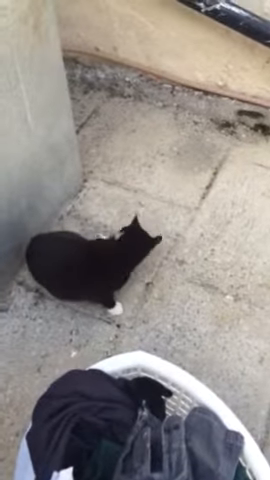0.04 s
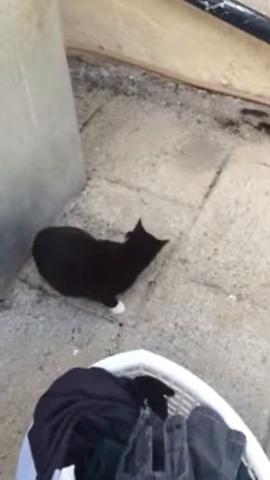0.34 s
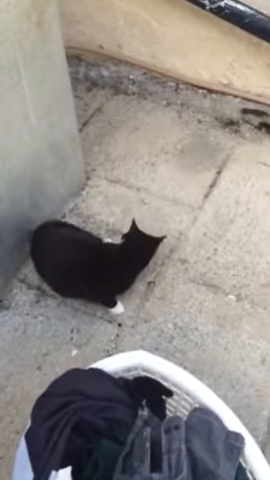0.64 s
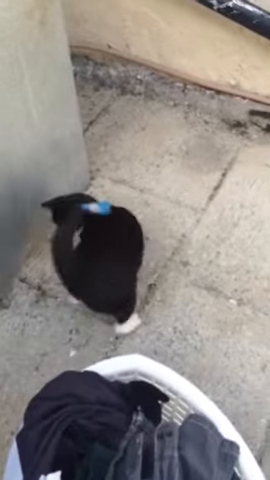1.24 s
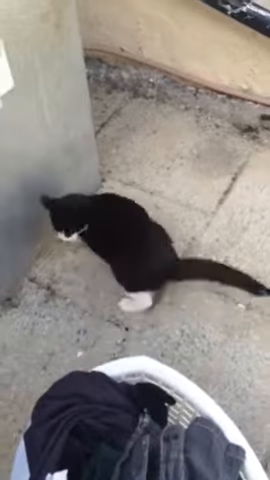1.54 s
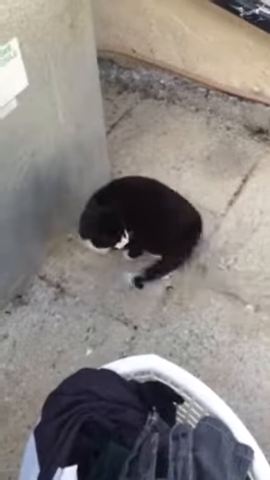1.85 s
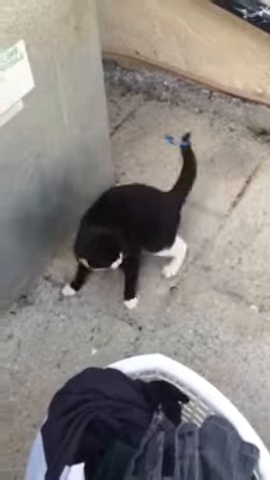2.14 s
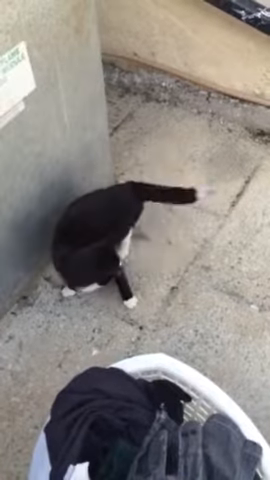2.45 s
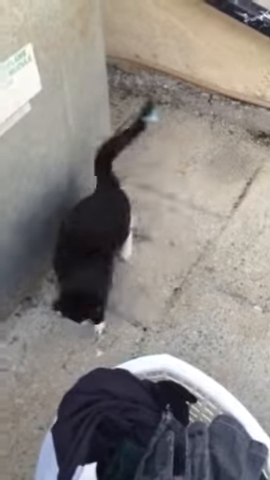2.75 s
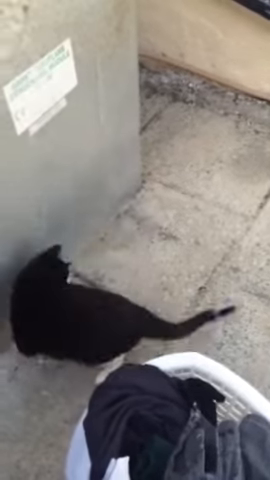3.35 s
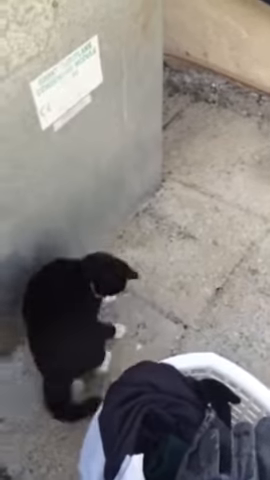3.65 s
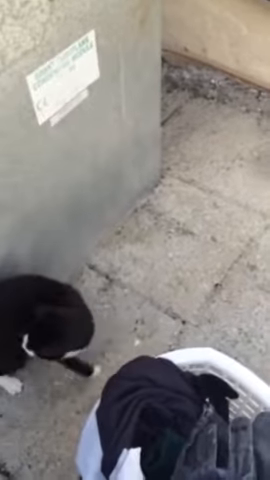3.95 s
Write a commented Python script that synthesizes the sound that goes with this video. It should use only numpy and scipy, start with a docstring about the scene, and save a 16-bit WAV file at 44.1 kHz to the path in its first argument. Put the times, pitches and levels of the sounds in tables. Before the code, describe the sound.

A plastic peg clicks on paving and bangs a metal cabinet, with faint birds behind.

```python
"""Cat with a peg on its tail

A cat spins in a small paved yard, a plastic clothes peg on its tail. The peg clicks on the slabs
and bangs a sheet-metal cabinet, which booms and clangs; paws thud softly and scuff over grit.
The walls throw back a short echo, and small birds whistle and trill far off over a low outdoor hum."""
import sys
import numpy as np
from scipy import signal
from scipy.fft import rfft, irfft
from scipy.io import wavfile

SR = 44100
rng = np.random.default_rng(int(sys.argv[2]) if len(sys.argv) > 2 else 0)


def generate_wav(sig):
    """Save sig (samples, or channels by samples) to the path in sys.argv[1] as 16-bit PCM at SR."""
    pcm = np.round(np.clip(np.atleast_2d(sig).T, -1, 1) * 32767).astype(np.int16)
    wavfile.write(sys.argv[1], SR, pcm)


N = 176400

# spectra of the still air and the distant hum (frequency [Hz], relative density [dB])
AIR_SPECTRUM = [(15, -42), (25, -5.5), (82, -1.5), (209, -2.5), (253, -11), (340, -18.5), (433, -14.5),
                (598, -14.5), (666, -19), (919, -16.5), (2920, -31), (6210, -27), (7910, -36.5),
                (13200, -37), (15500, -43)]
HUM_SPECTRUM = [(100, -22.5), (170, -10), (200, 5.5), (235, -6.5), (330, -5), (450, -19), (900, -27),
                (2500, -36.5), (8000, -67.5)]
# the hum's swells (time [s], level [dB])
HUM_SWELLS = [(0, -61), (.35, -64.5), (.9, -63.5), (1.35, -55.5), (1.65, -57.5), (2.049, -58.5), (2.3, -53),
              (2.55, -58), (2.85, -57.5), (4, -57)]
# trill notes (time [s], length [s], top pitch [Hz], relative level [dB])
TRILL_NOTES = [(-.125, 0.14, 6400, -58), (.04, 0.15, 6500, -58), (.205, .13, 6550, -56.5),
               (.37, 0.14, 6600, -57.5), (1.6, 0.15, 5800, -68.5), (1.82, 0.17, 6000, -67.5),
               (2.05, .12, 6000, -66), (2.3, 0.16, 5900, -73), (3.611, 0.078, 5920, -51.5),
               (3.713, 0.089, 5830, -56), (3.802, .08, 5750, -57), (3.889, 0.088, 5830, -55.5)]
# a trill note's rise and fall (position [share of the note], pitch [share of the top pitch])
TRILL_CONTOUR = [(0, .72), (.22, .9), (.42, 0.96), (.6, .82), (.8, .63), (1, .52)]
# bird whistles and buzzy sweeps (time [s], length [s], first pitch [Hz], last [Hz], relative level [dB])
BIRD_WHISTLES = [(0.56, .175, 7780, 7050, -62), (0.869, 0.056, 7170, 7440, -63),
                 (1.056, .05, 5700, 5420, -58), (1.118, 0.19, 7180, 7410, -66),
                 (1.359, 0.089, 6330, 5859, -51.5), (1.447, .05, 5200, 5645, -66),
                 (2.525, 0.12, 5880, 6860, -57), (3.108, 0.094, 8100, 7760, -67),
                 (3.357, 0.12, 5900, 5264, -54)]
BIRD_SWEEPS = [(1.061, 0.042, 5550, 4010, -55), (1.667, 0.031, 4430, 4037, -68),
               (2.732, 0.045, 3920, 2886, -60), (2.824, 0.073, 3310, 5300, -52),
               (3.008, 0.052, 5900, 3500, -55)]
# decay of the far reverb around the birds (frequency [Hz], t60 [s])
FAR_DECAY = [(3000, .6), (8000, .7)]
# peg hits (time [s], relative level [dB], body [dB], treble [dB], favoured ring [Hz], its lift [dB])
PEG_HITS = [(0.2486, -47, -12, -3, 6000, 14), (0.7678, -22, -16, -15.5, 3000, -0.5),
            (0.7716, -19.5, -24, -13.5, 5000, 4), (.785, -32, -13, -15, 2200, 10),
            (0.9038, -33.5, 4.5, -8.5, 1950, 9.5), (0.907, -30, -18, -7, 3000, 2),
            (0.9174, -28, -3, -11, 2000, 10), (0.9541, -34, -3, 1.5, 10000, 4),
            (0.9755, -29.5, -1.5, -6, 5000, 9), (.9778, -30, -10, 3, 8000, 4),
            (0.9859, -33.5, 3, 0, 8000, 8), (1.3767, -45.5, 14, 0, 1300, 4),
            (1.795, -40, -12, -5, 9000, 3.5), (1.987, -19, 1, -10, 2500, -6),
            (1.9902, -17.5, -4, -0.5, 2400, 8.5), (1.9922, -12, -6, -9.5, 4950, 1),
            (2.1238, -13, -15, -0.5, 9800, 7), (2.1252, -12, -10.5, -1.5, 12000, -5),
            (2.127, -19, -2.5, -0.5, 3400, -10), (2.9045, -13.5, 12, 6.5, 9000, 2),
            (2.9081, -17, 3.5, -6, 5500, 9), (2.9212, -12, -5, 1.5, 6000, 4.5),
            (2.9355, -23, -12, 10.5, 4000, 7), (3.1899, -11.5, -23, 5.5, 5700, 12.5),
            (3.5186, -3, 0, -12.5, 3200, 9), (3.5289, -5.5, 3.5, -3, 3300, 9),
            (3.535, -12, -7, -3, 9000, 3), (3.552, -23.5, -19, -3, 3450, 18),
            (3.6053, -26, -8, -10, 5500, 6), (3.651, -27.5, -2, -11, 3500, 2),
            (3.656, -27, -3, -4.5, 3600, 5), (3.868, -49, -6, 3, 8100, 2), (3.878, -48, -8, 6.5, 10960, -1)]
# modes ringing in each click: the plastic peg's, plus a ring near 2 kHz
# (frequency [Hz], relative level [dB], t60 [s])
CLICK_MODES = [(1084, -8.5, 0.017), (1595, -9, 0.013), (1970, -10.5, 0.017), (2500, -3.5, 0.0083),
               (3205, 1.5, .01), (3520, -8.5, 0.023), (4850, 0, 0.0082), (5690, -1.5, 0.0091),
               (7320, 3.5, 0.0036), (9350, -4, 0.0053), (10320, 3.5, 0.0056), (12100, -8, 0.0069),
               (13700, -6, .006)]
# decay of the yard's echo (frequency [Hz], t60 [s])
YARD_DECAY = [(150, .2), (500, 0.151), (3000, 0.18), (7000, 0.18), (15000, 0.13)]
# tone of the yard's echo (frequency [Hz], relative gain [dB])
YARD_EQ = [(100, -2), (400, 1), (1500, 2), (6000, 3), (15000, 0.5)]
# soft bumps of body and paws (time [s], pitch [Hz], relative level [dB], t60 [s])
CAT_THUDS = [(.62, 148, -47, 0.06), (.755, 64.4, -57, 0.13), (.897, 154, -37, 0.066),
             (.955, 114, -42, 0.069), (1.855, 133, -50, 0.14), (2.182, 232, -41, 0.044),
             (2.228, 238, -51, 0.18), (2.295, 122.5, -42, 0.081), (2.941, 159.7, -24, 0.12),
             (3.70, 165, -46, 0.1), (3.936, 148, -41.5, 0.16), (3.957, 143.4, -28, 0.081),
             (3.978, 110, -30.5, 0.12)]
# scrapes over the slabs (time [s], length [s], level [dB])
PAW_SCUFFS = [(.74, 0.064, -60), (.775, 0.068, -49), (.875, 0.078, -50), (.95, 0.063, -52.5),
              (1.27, 0.12, -72), (3.65, 0.059, -56.5), (3.86, 0.052, -60.5)]
# spectrum of slipping grit (frequency [Hz], relative density [dB])
GRIT_SPECTRUM = [(200, 16), (1200, -22.5), (1900, 6), (4500, 3.5), (7000, -2), (11000, -10.5), (16000, -34)]
# blows on the cabinet (time [s], clang level [dB], relative boom level [dB])
CABINET_KNOCKS = [(2.9048, -16, -17), (2.921, -31.5, -25.5), (2.943, -44, -27.5), (3.1899, -26, -26.5),
                  (3.519, -26, -44), (3.5295, -26.5, -42.5)]
# the metal panel's low modes (frequency [Hz], relative level [dB], t60 [s])
PANEL_MODES = [(68, -4.5, .35), (112.4, -5, 0.42), (136.4, -7, 0.3), (171, -1, .25), (223.3, 0, 0.37),
               (266, -2, .22), (341, -0.5, 0.11), (393.6, -4.5, 0.13), (450.8, -2, 0.13), (553, -9.5, 0.13),
               (625, -7.5, 0.14), (717, -10.5, .15), (794, -5, 0.12), (878, -2.5, .13), (1052, -7, 0.095)]
# its crowded upper modes (frequency [Hz], relative density [dB])
CLANG_SPECTRUM = [(60, -18), (250, 7.5), (500, 5), (1000, 1.5), (1700, -3.5), (3200, 1), (5500, 0),
                  (8000, -1.5), (11000, -2), (16000, -11)]
# their decay (frequency [Hz], t60 [s])
CLANG_DECAY = [(200, 0.12), (1000, 0.13), (4000, 0.13), (9000, 0.11), (16000, 0.078)]

YARD_DB, YARD_DELAY_S = -12, 0.00409
BODY_HZ, TREBLE_HZ, RING_OCTAVES = 1900, 6500, 0.19
MODE_SPREAD_DB, MODE_DETUNE = 3.5, 0.026
GRAINS_PER_S, GRAIN_SPREAD_DB = 6100, 3.5
THUD_RISE_S, BOOM_RISE_S = 0.0048, 0.0065


def amp(db):
    """Decibels to gain."""
    return 10 ** (np.asarray(db) / 20)


def unit(x):
    """Scales to rms 1."""
    return x / np.sqrt(np.mean(x ** 2) + 1e-20)


def curve_at(points, hz):
    """Reads a table on a log-frequency axis."""
    f, value = np.transpose(points)
    return np.interp(np.log(hz + 1), np.log(f + 1), value)


def add(mix, s, sound):
    """Mixes a sound in at s seconds."""
    at = round(s * SR)
    sound = sound[max(-at, 0):]
    part = mix[max(at, 0):][:len(sound)]
    part += sound[:len(part)]


def equalise(x, db_at, size=4096):
    """Minimum-phase EQ whose gain in dB is a function of frequency."""
    log_gain = np.log(amp(db_at(abs(np.fft.fftfreq(size, 1 / SR)))))
    taps = np.fft.ifft(np.exp(np.conj(signal.hilbert(log_gain)))).real
    return signal.fftconvolve(x, taps[:size // 2])[:len(x)]


def noise(spectrum, count):
    """Steady noise of a given spectrum, at rms 1."""
    gain = amp(curve_at(spectrum, np.fft.rfftfreq(count, 1 / SR)))
    return unit(irfft(rfft(rng.standard_normal(count)) * gain, count))


def drift(count, hz):
    """Smooth random motion, rolled off above hz."""
    rolloff = 1 + (np.fft.rfftfreq(count, 1 / SR) / hz) ** 4
    return unit(irfft(rfft(rng.standard_normal(count)) / rolloff, count))


def fade(t, t60):
    """Exponential decay, 60 dB down at t60."""
    return np.exp(-np.log(1000) * t / t60)


def die_away(x, t60s, size=256):
    """Lets each band of a sound fade at its own speed."""
    hz, t, bands = signal.stft(x, SR, nperseg=size)
    bands = bands * fade(t, curve_at(t60s, hz)[:, None])
    return signal.istft(bands, SR, nperseg=size)[1][:len(x)]


def echo(x, t60s, delay_s, size=SR):
    """Dense reflections after a pre-delay, from a fresh tail of energy 1."""
    tail = die_away(rng.choice([-1., 1.], size), t60s)
    tail *= np.arange(size) / SR > delay_s
    return signal.fftconvolve(x, tail / np.linalg.norm(tail))[:len(x)]


def outdoor_bed():
    """Still air and a distant low hum that comes and goes."""
    air = noise(AIR_SPECTRUM, N) * amp(-60 - 0.54 * drift(N, hz=5))
    hum_db = np.interp(np.arange(N) / SR, *np.transpose(HUM_SWELLS))
    return air + noise(HUM_SPECTRUM, N) * amp(hum_db)


def bird_note(hz, level_db, waver=0.028):
    """A fluttering tone that swells and fades; a fast waver in pitch makes it buzzy."""
    cycles = np.cumsum(hz * (1 + waver * drift(len(hz), hz=200))) / SR
    flutter_db = 2.2 * drift(len(hz), hz=40)
    envelope = amp(level_db + flutter_db) * signal.windows.tukey(len(hz), .4)
    return envelope * np.sin(2 * np.pi * cycles)


def far_off(x, direct_db=-10.5, echo_db=-4.5, delay_s=0.006):
    """Distance: part of the sound comes straight, part by way of walls and roofs."""
    return amp(direct_db) * x + amp(echo_db) * echo(x, FAR_DECAY, delay_s)


def birds():
    """Thin whistles that settle on a pitch; farther off, buzzy sweeps and trills of arching slurs."""
    whistles, sweeps = np.zeros((2, N))
    for s, length, first_hz, last_hz, db in BIRD_WHISTLES:
        progress = np.linspace(0, 1, int(length * SR))
        pitch = last_hz + (first_hz - last_hz) * (1 - progress) ** 3.6
        add(whistles, s, bird_note(pitch, db, waver=0.006))
    for s, length, first_hz, last_hz, db in BIRD_SWEEPS:
        pitch = np.geomspace(first_hz, last_hz, int(length * SR))
        add(sweeps, s, bird_note(pitch, db))
    song = far_off(whistles, direct_db=-3.5, echo_db=-5.5, delay_s=0.0041) + far_off(sweeps)
    for s, length, top_hz, db in TRILL_NOTES:
        progress = np.linspace(0, 1, int(length * SR))
        pitch = top_hz * np.interp(progress, *np.transpose(TRILL_CONTOUR))
        add(song, s, far_off(np.pad(bird_note(pitch, db), (0, SR // 2))))
    return song


def peg_click(level_db, body_db, treble_db, ring_hz, lift_db, crack_db):
    """A crack and a brief ring; the point of contact favours one range of modes."""
    def contact_eq(hz):
        """Low shelf, high shelf and a bell on the favoured ring."""
        body = body_db / (1 + (hz / BODY_HZ) ** 4)
        treble = treble_db * (1 - 1 / (1 + (hz / TREBLE_HZ) ** 4))
        bell = lift_db * np.exp(-.5 * (np.log2((hz + 1) / ring_hz) / RING_OCTAVES) ** 2)
        return body + treble + bell

    t = np.arange(SR // 16) / SR
    ring = np.zeros(len(t))
    for hz, db, t60 in CLICK_MODES:
        gain = amp(db + MODE_SPREAD_DB * rng.standard_normal()) * rng.choice([-1, 1])
        pitch = hz * (1 + MODE_DETUNE * rng.standard_normal())
        ring += gain * fade(t, t60) * np.sin(2 * np.pi * pitch * t)
    crack = rng.standard_normal(len(t)) * fade(t, t60=0.013)
    click = unit(ring) + amp(crack_db) * unit(crack)
    click /= np.sqrt(np.sum(click ** 2) / (SR // 4000))  # the energy of a quarter millisecond at rms 1
    return amp(level_db) * equalise(click, contact_eq)


def peg():
    """Each hit lands in a new spot, so the walls return it by new paths, with more crack than ring."""
    direct, returned = np.zeros((2, N))
    for s, *hit in PEG_HITS:
        add(direct, s, peg_click(*hit, crack_db=0.5))
        scattered = np.pad(peg_click(*hit, crack_db=5), (0, SR // 5))
        add(returned, s, echo(scattered, YARD_DECAY, YARD_DELAY_S, size=SR // 4))
    return direct, returned


def cat_thud(hz, level_db, t60):
    """A padded blow: a few low, damped swings."""
    t = np.arange(SR // 3) / SR
    envelope = (1 - np.exp(-t / THUD_RISE_S)) * fade(t, t60)
    return 2 * amp(level_db) * envelope * np.sin(2 * np.pi * hz * t)


def paw_scuff(length, level_db):
    """Grains of grit catch and slip under one short stroke."""
    count = int(length * SR)
    grains = rng.standard_normal(count) * amp(GRAIN_SPREAD_DB * rng.standard_normal(count))
    grains *= rng.random(count) < GRAINS_PER_S / SR
    grit = unit(equalise(grains, lambda hz: curve_at(GRIT_SPECTRUM, hz)))
    stroke = np.sin(np.pi * np.linspace(0, 1, count) ** 0.81)
    return amp(level_db) * grit * stroke


def cabinet_knock(clang_db, boom_db):
    """The sheet metal booms in its low modes under a clang of crowded high ones."""
    t = np.arange(SR // 2) / SR
    boom = sum(amp(db) * fade(t, t60) * (-1) ** k * np.sin(2 * np.pi * hz * t)
               for k, (hz, db, t60) in enumerate(PANEL_MODES))
    boom *= 1 - np.exp(-t / BOOM_RISE_S)
    clang = die_away(noise(CLANG_SPECTRUM, len(t)), CLANG_DECAY)
    return amp(clang_db) * clang + .5 * amp(boom_db) * boom


def scene():
    """Peg, cabinet and cat between the yard walls, with the birds and the outdoor bed beyond."""
    near = np.zeros(N)
    for cues, source in (CABINET_KNOCKS, cabinet_knock), (PAW_SCUFFS, paw_scuff), (CAT_THUDS, cat_thud):
        for s, *cue in cues:
            add(near, s, source(*cue))
    clicks, click_echoes = peg()
    echoes = click_echoes + echo(near, YARD_DECAY, YARD_DELAY_S)
    walls = equalise(echoes, lambda hz: YARD_DB + curve_at(YARD_EQ, hz))
    return (near + clicks + walls + birds() + outdoor_bed())[None]


def record(dry):
    """A steep low-pass trims the very top of the mix."""
    lowpass = signal.firwin(255, cutoff=15600, window=("kaiser", 8), fs=SR)
    return signal.oaconvolve(dry, lowpass[None], "same")


dry = scene()
out = record(dry)
generate_wav(out)
```